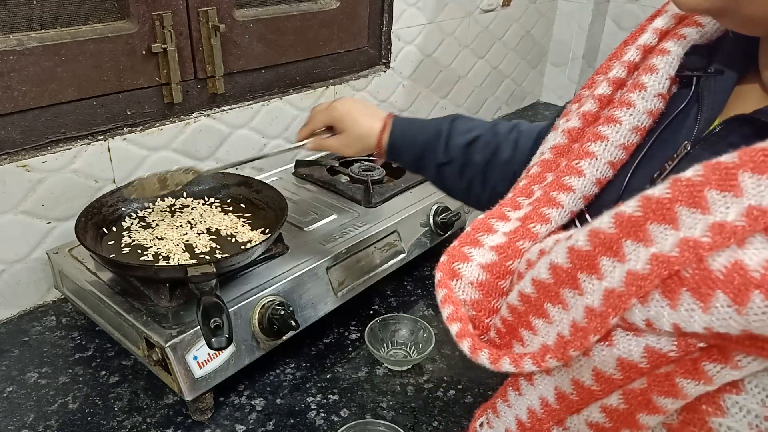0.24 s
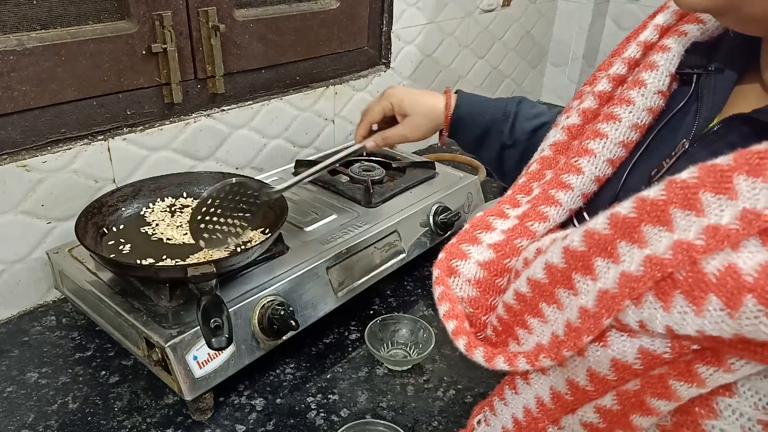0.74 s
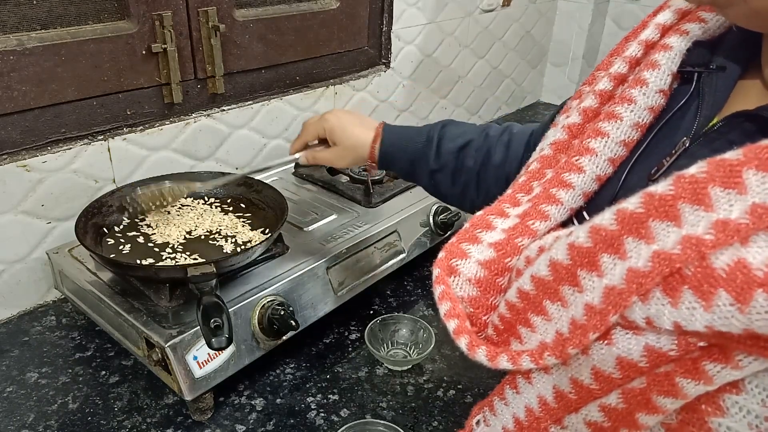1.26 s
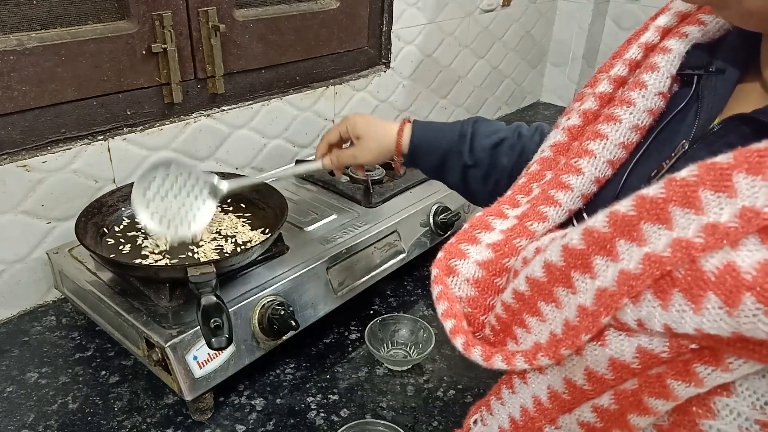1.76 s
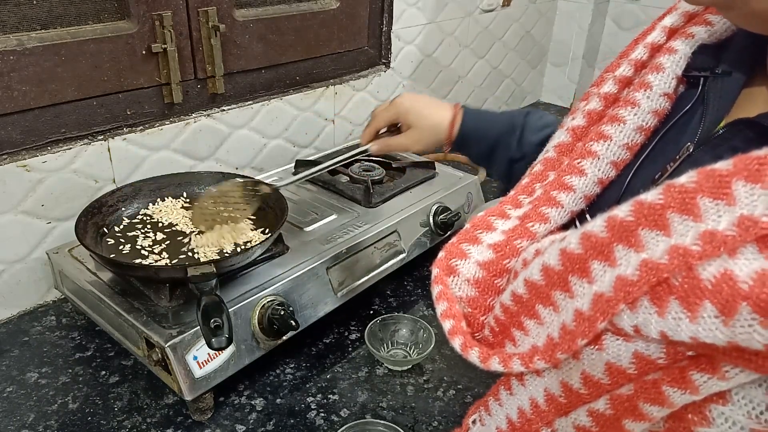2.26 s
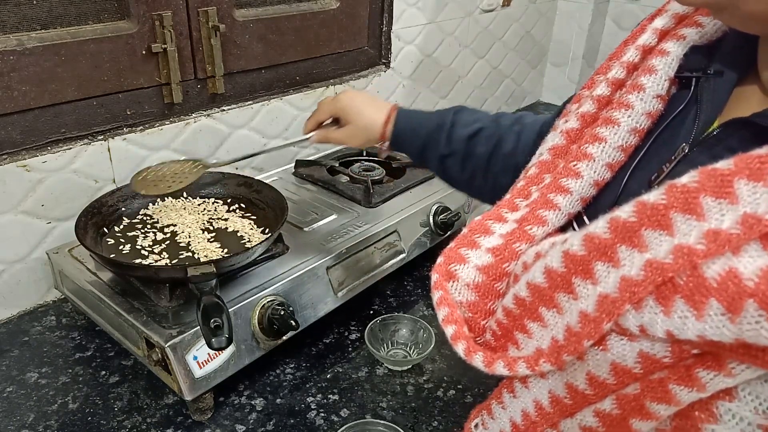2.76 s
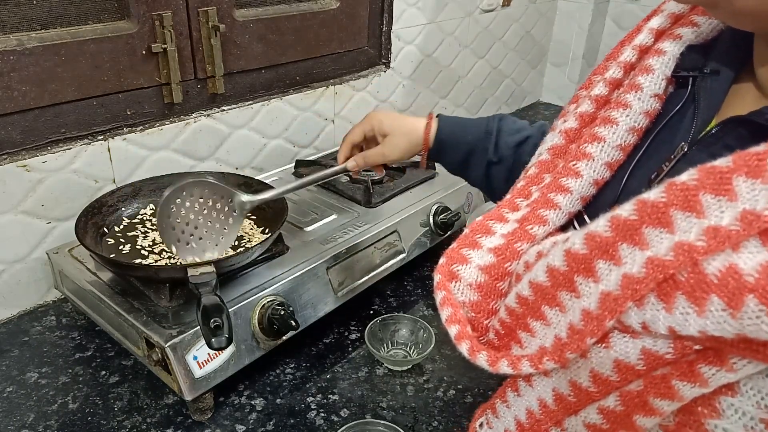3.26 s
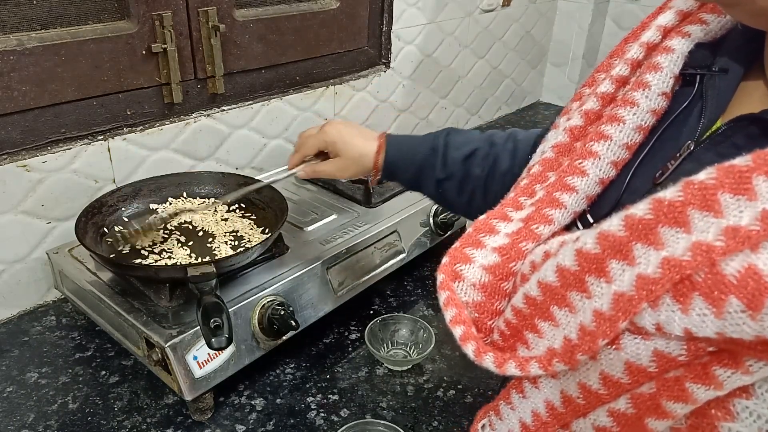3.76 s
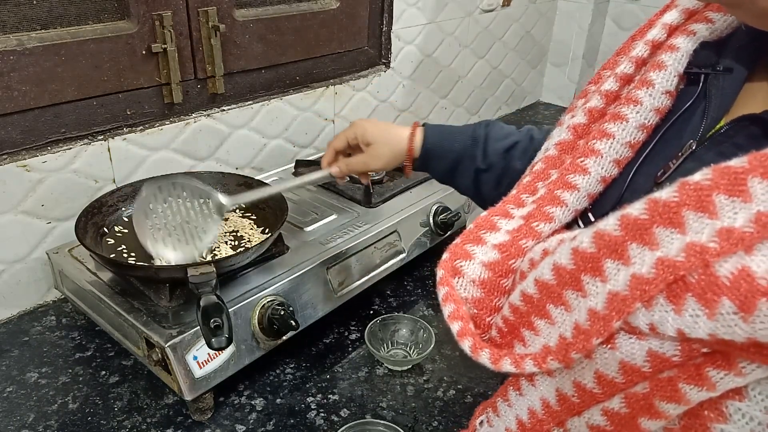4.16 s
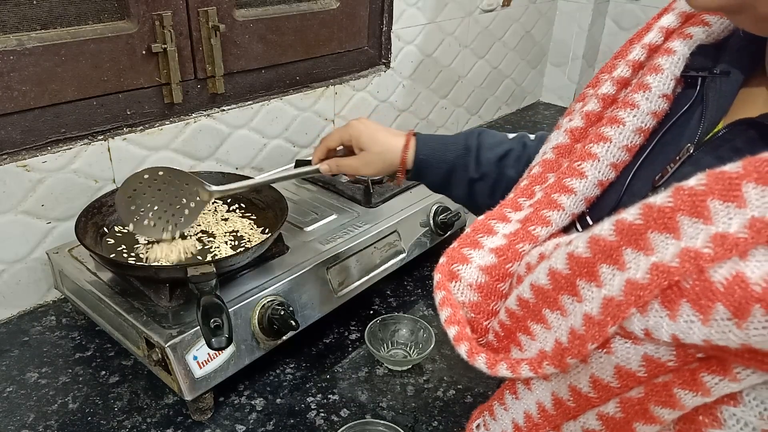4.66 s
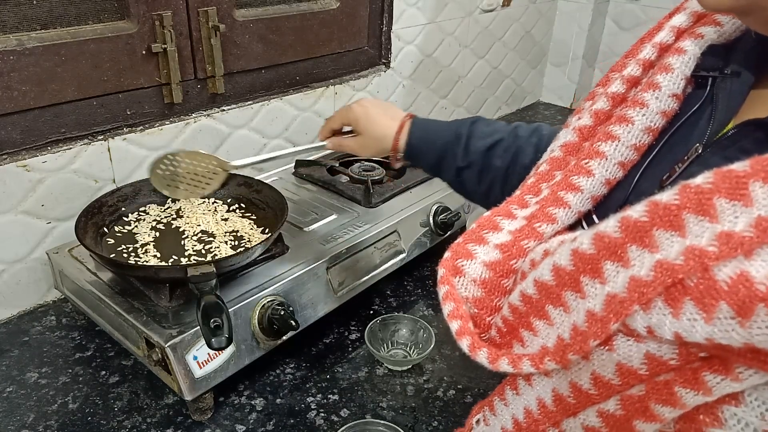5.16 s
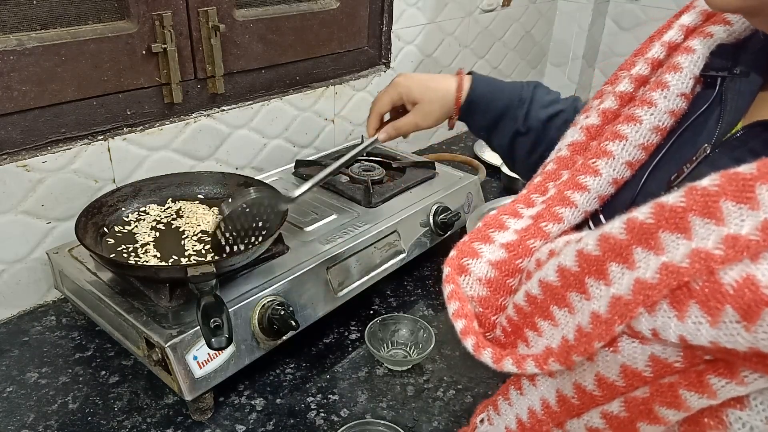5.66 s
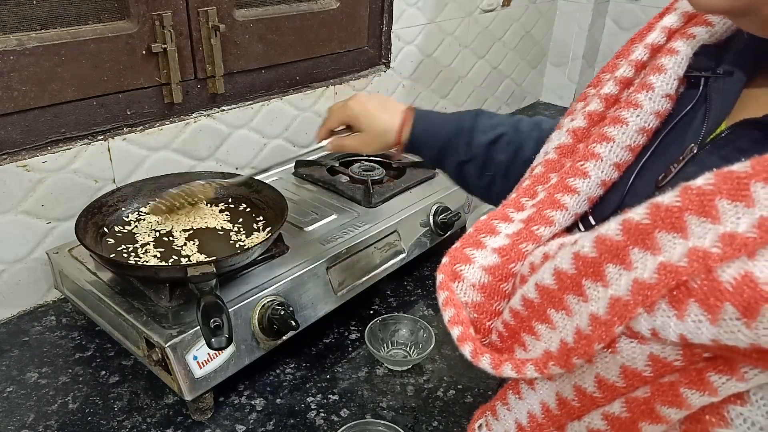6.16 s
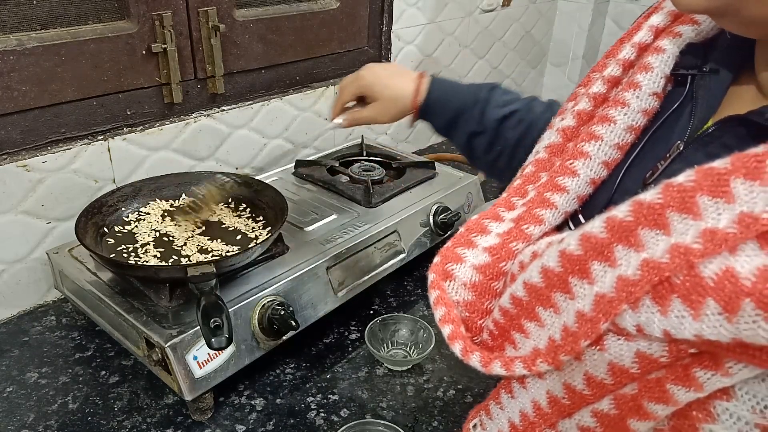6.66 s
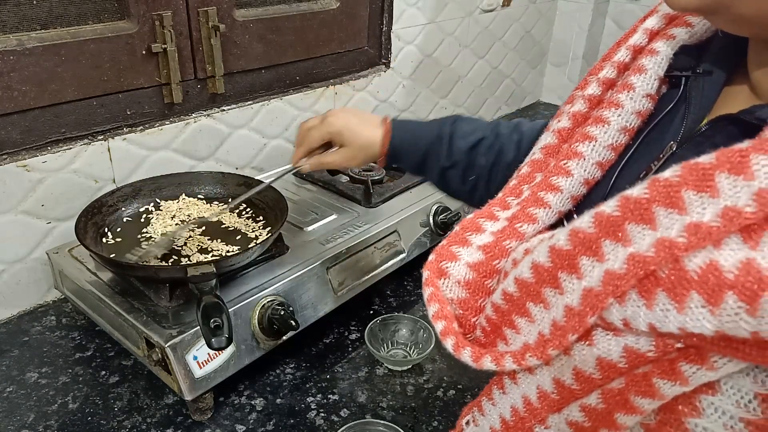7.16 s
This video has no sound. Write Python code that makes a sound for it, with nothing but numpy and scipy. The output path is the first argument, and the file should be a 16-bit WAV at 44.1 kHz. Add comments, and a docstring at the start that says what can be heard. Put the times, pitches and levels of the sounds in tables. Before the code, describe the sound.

A gas burner hushes very quietly throughout, in a bright tiled kitchen heard from fairly close. At 0.03 s a steel spoon hits the frying pan with a sharp ringing clank. Softer, seed-muffled knocks follow around 0.5, 1.0, 1.4 and 1.8 s, some with chattering contact, joined by low rumbling and dry rustling strokes. A bright clank comes at 2.5 s, then a heavy, booming one at 2.95 s. At 3.8 s the edge scrapes hard on metal with thin tinks; another clank rings at 4.2 s. Duller stirs lead to a strong chattering scrape at 5.4 s and a bright tink at 5.5 s. Paired clanks strike near 5.8 and 6.6 s, with gentle stirring between. A longer soft stroke starts at 7.05 s, with tiny seed ticks and a last knock at 7.3 s. Pan resonance and a faint low stove boom linger after sharp hits.

```python
"""A steel spoon stirs seeds in a frying pan: noise knocks and ringing modes make its thuds, clanks and
chatter. Each stroke is random tiny contacts: seeds rumble and rustle as they are shoved aside, then the
edge bites the metal and scrapes in stick-slip. Hot seeds tick now and then as short noise bursts, and
the spoon's rim sometimes tinks. Under it a gas burner hushes as coloured noise, the hollow stove booms
after sharp knocks, and the tiled kitchen adds reflections."""
import sys
import numpy as np
from scipy import signal
from scipy.fft import rfft, irfft
from scipy.io import wavfile
from scipy.ndimage import uniform_filter1d, map_coordinates

SR = 44100
rng = np.random.default_rng(int(sys.argv[2]) if len(sys.argv) > 2 else 0)


def store_pcm(level_fs):
    """Save levels as 16-bit WAV."""
    pcm = np.round(np.clip(level_fs, -1, 1) * 32767).astype(np.int16)
    wavfile.write(sys.argv[1], SR, np.atleast_2d(pcm).T)


N = 326781  # length in samples
RING = np.arange(SR) / SR  # one second of time, in seconds


def undb(db):
    """Turn decibels into a gain."""
    return 10 ** (np.asarray(db) / 20)


def unit(x):
    """Scale a sound to rms 1."""
    return x / np.sqrt(np.mean(x ** 2))


def unit_energy(x):
    """Scale a short sound or response to energy 1."""
    return x / np.linalg.norm(x)


def ramp(x):
    """Rise from 0 to 1 and stay there."""
    return np.clip(x, 0, 1)


def through(x, response):
    """Pass a sound through an impulse response."""
    return signal.fftconvolve(x, response)[:len(x)]


def colour(x, points, size=4096):
    """Filter a sound to the given (pitch_hz, level_db) outline, with no sound before its cause."""
    hz, db = np.transpose(points)
    grid = np.log(np.fft.rfftfreq(size, 1 / SR) + 1)
    log_gain = np.log(undb(np.interp(grid, np.log(hz), db)))
    # folding the cepstrum gives the minimum-phase response
    cepstrum = irfft(log_gain)[:size // 2]
    cepstrum[1:] *= 2
    response = irfft(np.exp(rfft(cepstrum, size)))[:size // 2]
    return through(x, response)


def fade(t60):
    """Die away over one second of time, falling 60 dB every t60 seconds."""
    return undb(-60 * RING / t60)


def walk(rate):
    """Wander slowly at random, with rms 1; rate is in new values per second."""
    k = int(SR / rate)
    steps = np.repeat(rng.standard_normal(N // k + 1), k)
    return unit(uniform_filter1d(steps, k)[:N])


def clicks(rate, spread_db, size):
    """Random tiny contacts of uneven strength, about rate per second, at rms 1."""
    sign = rng.choice([-1, 1], size)
    strength = sign * undb(spread_db * rng.uniform(-1, 1, size))
    return unit((rng.random(size) < rate / SR) * strength)


def modes(hz, db, t60, scatter_db, split, count=3):
    """Ringing metal: unevenness splits each mode into close partials that beat, wider in the treble."""
    hz, db, t60 = (np.repeat(v, count) for v in (hz, db, t60))
    sign = rng.choice([-1, 1], len(hz) // count).repeat(count)
    gain = undb(db + scatter_db * rng.standard_normal(len(hz))) * sign
    hz = hz * (1 + split * hz / 1000 * rng.uniform(-1.01, 1, len(hz)))
    phase = (2 * np.pi * hz[:, None] * RING).astype(np.float32)
    decay = np.exp((-np.log(1000) / t60[:, None] * RING).astype(np.float32))
    return unit_energy(gain @ (np.sin(phase) * decay))


def roll_off(hz, cut_hz, db_per_oct):
    """Gain of a contact: flat up to its cut-off, then falling."""
    return 1 / np.hypot(1, undb(db_per_oct * np.log2(hz / cut_hz)))


# how long the tiled room rings: pitch_hz, t60_s (time to fall 60 dB)
ROOM_DECAY = [(100, 0.36), (260, 0.86), (700, 0.65), (1840, 0.68), (4850, 0.67), (12800, 0.32)]


def kitchen(wet_db, build_s=0.0017):
    """Direct sound, then dense reflections from the tiles that build up and fade at each pitch's own pace."""
    hz, t60 = np.transpose(ROOM_DECAY)
    noise = rfft(rng.standard_normal(SR))
    log_hz = np.log(np.arange(len(noise)) + 1)
    tail = np.zeros(SR)
    for share, t in zip(np.eye(len(hz)), t60):
        # share picks out one overlapping band
        tail += irfft(noise * np.interp(log_hz, np.log(hz), share), SR) * fade(t)
    response = undb(wet_db) * unit_energy(tail * (1 - np.exp(-RING / build_s)))
    response[0] += 1
    return response


# tone of the gas flame: pitch_hz, level_db (relative)
FLAME_TONE = [(24, -25), (40, 8.5), (91, 22.5), (570, -3), (790, 8), (1210, -6.5), (1370, 0.5),
              (1760, -10.5), (5440, -8), (16000, -15.5)]


def burner(level_db=-52.5, flutter_db=0.53):
    """The gas flame: noise coloured to a soft, slightly fluttering hush."""
    hush = unit(colour(rng.standard_normal(N), FLAME_TONE))
    return undb(level_db + flutter_db * walk(15)) * hush


# bright resonances of the spoon's bowl: pitch_hz, width_hz, level_db (relative)
BOWL_MODES = [(7220, 60, -0.5), (6870, 23, -3), (6540, 16, -5), (8230, 9.1, -10), (9830, 42, 1),
              (10350, 77, -15), (10640, 48, 1.5), (13200, 29, -9), (13700, 31, -2), (14500, 30, -19),
              (15000, 80, 0)]


def spoon_bowl(scatter_db):
    """The spoon's bowl rings at its own pitches; a narrower resonance rings longer."""
    hz, width_hz, level_db = np.transpose(BOWL_MODES)
    return modes(hz, level_db, np.log(1000) / (np.pi * width_hz), scatter_db, split=0.0015)


# ringing of the pan: pitch_hz, t60_s (left to ring freely), wall_db, floor_db, scraped_db
# (relative levels when struck on the wall, struck on the floor, or scraped)
PAN_MODES = [(203, 3.24, -28, -28, -49), (229.3, 2.04, -26, -19.5, -44), (355.4, 1.1, -15, -12, -8),
             (438, 0.42, -11, -19, -23), (473.3, 0.26, -8.5, 15.5, -10), (660, 1.1, 1, 2, -4),
             (710, 0.74, -4.5, 8.5, -12), (755, 0.53, 8.5, 4.5, -33), (812.8, 0.77, -12, -1.5, 4),
             (793, 1.7, 1, -37, -42), (851, 1, -5, -15, -27), (962, 0.64, 3.5, -5, -10),
             (960, 0.82, 7, -11, -29), (1148, 0.48, -12, 7, -4), (1141, 0.58, -13, 10, -40),
             (1341, 0.64, -6, 9.5, -10), (1381, 0.29, -10, 15.5, 6.5), (1417, 0.66, 5, -28, 6.5),
             (1678, 0.23, 4, -12, -13.5), (1780, 0.38, 5, -17, -17), (2047, 0.59, -9, -6, 0.5),
             (2079, 0.77, -25.5, 5.5, 4), (2134, 0.92, -38, -26, 0.5), (2740, 0.92, -27, -17, -13),
             (3183, 0.7, -18, -20, -2), (3600, 0.45, -17, -14, -14), (4260, 0.45, -42, -34, -7.5),
             (5040, 0.23, -12, -16, -24), (5440, 0.35, -2, -27, -7), (6400, 0.24, -34, -29, -40)]
# tone of the short clank: pitch_hz, level_db (relative)
CLANK_TONE = [(71, -65), (120, -48.5), (231, -21.5), (418, -16), (473, -9), (580, -10), (773, 12),
              (856, -8.5), (930, -3.5), (1070, -4), (1340, -8), (2930, -28), (3170, -23), (6240, -30),
              (16000, -52)]


def blow(room, steel_db, place, chatter_db, chatter_s, ring_db=-1.5, ring_growth=0.13,
         bowl_db=-29, bowl_choke=0.26, clank_t60=0.049, crack_db=-8, crack_t60=0.062):
    """One knock: a crack, a dense clank and the ring of pan and spoon; then the spoon buzzes on the metal."""
    pan_hz, pan_t60, wall_db, floor_db, _ = np.transpose(PAN_MODES)
    clank, crack = (unit_energy(rng.standard_normal(SR) * fade(t)) for t in (clank_t60, crack_t60))
    buzz = clicks(rate=810, spread_db=4, size=SR) * np.exp(-(RING / chatter_s) ** 4)
    contacts = undb(chatter_db) * unit_energy(buzz)
    contacts[0] += 1  # the first hit
    # a harder knock rings the pan more and chokes the spoon's bowl
    struck_db = wall_db + place * (floor_db - wall_db)
    ring = modes(pan_hz, struck_db, pan_t60, scatter_db=1.5, split=0.00504)
    ring *= undb(ring_db + ring_growth * steel_db)
    bowl = spoon_bowl(scatter_db=3) * undb(bowl_db - bowl_choke * steel_db)
    body = unit_energy(through(unit_energy(colour(clank, CLANK_TONE)) + bowl, room))
    edge = unit_energy(colour(crack, [(200, -31), (800, 7), (1250, -5.0), (1700, -4.5), (2500, -17),
                                      (7000, -18.0), (16000, -42)]))
    return through(body + ring, contacts) + undb(crack_db) * edge


# edges of the bands that set a knock's balance: pitch_hz
BAND_EDGES = [150, 550, 1000, 2400, 8000, 16000]


def band_levels(x, weigh_s=0.22):
    """Level of a knock's first moments in each band, in dB."""
    size = int(weigh_s * SR)
    power = 2 * abs(rfft(x[:size], SR)) ** 2 / (SR * size)
    return 10 * np.log10([power[lo:hi].sum() for lo, hi in zip(BAND_EDGES, BAND_EDGES[1:])])


# spoon blows: start_s, thud_db, thud_cutoff_hz, steel_db (bare metal contact), steel_cutoff_hz,
# place (0 wall to 1 floor), chatter_db; all levels are relative
SPOON_BLOWS = [(0.03, -7.5, 328, 0.5, 15000, 0.34, -7), (0.476, -15.5, 524, -26.5, 900, 0.79, 4),
               (0.987, -14.5, 390, -31.5, 6040, 0.35, 8), (1.413, -10.5, 473, -39, 6000, 0.34, 16),
               (1.802, -10, 272, -33, 9000, 0.31, -2), (1.828, -20, 380, -20.5, 6650, 1, -30),
               (2.154, -9, 553, -13, 1080, 0.69, -12), (2.541, -12, 314, -0.5, 10700, 0.26, -5),
               (2.947, 2, 573, 3.5, 1620, 0.32, 0), (3.414, -6.5, 487, -19.5, 1580, 0.57, -8),
               (3.761, -15, 542, -30.5, 1200, 0.4, -19), (3.786, -6, 636, -7, 1100, 0.51, 7.5),
               (4.23, -8, 450, 0.5, 2360, 0.55, -3), (4.321, -19, 450, -12.5, 5200, 0.67, -27),
               (4.571, -10, 485, -24, 1000, 0.27, -10), (4.97, -11, 480, -21.5, 7450, 0.73, -28),
               (4.998, -13, 456, -19, 2670, 1, -21), (5.265, -8.5, 600, -25.5, 9000, 0.36, -1),
               (5.424, -6.5, 600, -15.5, 1000, 0.63, 18), (5.781, -9, 357, -2, 9400, 0.38, -4.5),
               (5.841, -1, 440, 0.5, 4600, 0.59, -21), (6.225, -15.5, 537, -23.5, 1200, 0.75, -2),
               (6.593, -7, 378, -0.5, 13500, 0.41, 3), (6.683, -2.5, 550, 1, 2700, 0.76, -39),
               (7.171, -17.5, 453, -21.5, 6000, 1, -31), (7.318, -7, 710, -10.5, 1760, 0.37, -15)]
# reference knock in each band, before contact strength and cut-off: level_db on the wall, on the floor
WALL_BALANCE = [-34, -19.5, -34, -35.5, -36.5]
FLOOR_BALANCE = [-30, -34, -24.5, -30.5, -36]
STEEL_DB_PER_OCT = 10  # how steeply a longer contact loses its treble
# the buzz lasts this long, or this share of the time to the next blow if that is shorter
CHATTER_S, CHATTER_SHARE = 0.11, 0.47


def blows(bass_db=-5):
    """Steel on steel: the sharper the contact, the brighter the knock."""
    out, room = np.zeros(N + SR), kitchen(wet_db=5.5)
    centres = np.sqrt(np.multiply(BAND_EDGES[:-1], BAND_EDGES[1:]))
    hz = np.geomspace(BAND_EDGES[0], BAND_EDGES[-1], 28)
    gaps = np.diff([row[0] for row in SPOON_BLOWS], append=np.inf)
    for (s, _, _, steel_db, cut_hz, place, chatter_db), gap_s in zip(SPOON_BLOWS, gaps):
        chatter_s = min(CHATTER_S, CHATTER_SHARE * gap_s)
        knock = blow(room, steel_db, place, chatter_db, chatter_s)
        # bring every band to its level for this place on the pan
        target_db = WALL_BALANCE + place * np.subtract(FLOOR_BALANCE, WALL_BALANCE)
        balance = target_db - band_levels(knock)
        body_db = np.interp(np.log(hz), np.log([hz[0], *centres]), [balance[0] + bass_db, *balance])
        contact_db = steel_db + 20 * np.log10(roll_off(hz, cut_hz, STEEL_DB_PER_OCT))
        start = int(s * SR)
        out[start:start + SR] += colour(knock, list(zip(hz, body_db + contact_db)))
    return out[:N]


# tone of pan and stove thudding together: pitch_hz, level_db (relative)
THUD_TONE = [(70, -15.5), (130, -17), (175, -6), (245, 1.5), (300, -0.5), (355, 5), (410, -5.5),
             (470, 11.5), (560, -2), (700, 12), (1200, -12.5)]
THUD_DB_PER_OCT = 25  # fall above each thud's cut-off
# at this steel level a thud swells over this time; less steel makes it slower
CUSHION_S, CUSHION_DB = 0.0068, -30.5


def thuds(db=8, t60=0.15, tail_db=-12, tail_t60=1.0):
    """Each blow, cushioned by seeds, jolts pan and stove: a dull noise thud that hangs briefly in the room."""
    out = np.zeros(N + SR)
    hz = np.geomspace(50, 5000, 40)
    decay = fade(t60) + undb(tail_db) * fade(tail_t60)
    for s, thud_db, cut_hz, steel_db, *_ in SPOON_BLOWS:
        swell = 1 - np.exp(-RING * undb(steel_db - CUSHION_DB) / CUSHION_S)
        jolt = colour(rng.standard_normal(SR) * swell * decay, THUD_TONE)
        soft_db = 20 * np.log10(roll_off(hz, cut_hz, THUD_DB_PER_OCT))
        cushioned = colour(jolt, list(zip(hz, soft_db)))
        start = int(s * SR)
        out[start:start + SR] += undb(db + thud_db) * unit_energy(cushioned)
    return out[:N]


def stove_boom(hz=72, t60=1.65, swell_s=0.027, db=-35, floor_db=-14, sharp_hz=3500):
    """Sharp steel knocks, most of all on the pan's wall, shake the hollow stove, which swells into a low boom."""
    force = np.zeros(N)
    for s, _, _, steel_db, cut_hz, place, _ in SPOON_BLOWS:
        sharpness = roll_off(sharp_hz, cut_hz, STEEL_DB_PER_OCT)
        force[int(s * SR)] = undb(db + steel_db + floor_db * place) * sharpness
    boom = np.sin(2 * np.pi * hz * RING) * fade(t60) * (1 - np.exp(-RING / swell_s))
    return through(force, boom)


def seed_jumps(db=-44.5, growth=0.55, t60=0.29):
    """Loudness of the patter of seeds thrown up by the blows: a heavier thud throws up more."""
    kicks = np.zeros(N)
    for s, thud_db, *_ in SPOON_BLOWS:
        kicks[int(s * SR)] = undb(db + growth * thud_db)
    return through(kicks, fade(t60))


# strokes through the seeds: start_s, length_s, bite_s (time until the edge bites the metal),
# drag_db, scrape_db, rustle_db (levels before the mix gains in stirring)
SPOON_STROKES = [(0.496, 0.31, 0.12, -44, -51, -52), (0.979, 0.28, 0.08, -50, -52.5, -51),
                 (1.367, 0.31, 0.084, -44.5, -53, -54.5), (1.823, 0.14, 0.04, -39.5, -46.5, -52.5),
                 (2.138, 0.37, 0.17, -47, -56.5, -54), (3.177, 0.099, 0.04, -60, -51, -60),
                 (3.39, 0.22, 0.036, -49, -52, -56), (3.774, 0.19, 0.12, -34, -22.5, -51),
                 (4.584, 0.28, 0.13, -43, -51.5, -52), (4.956, 0.14, 0.013, -42.5, -47, -70),
                 (5.382, 0.14, 0.13, -26.5, -25.5, -50), (6.21, 0.29, 0.13, -45.5, -52, -56),
                 (7.043, 0.53, 0.13, -41.5, -55, -48.5)]
LAND_S, LIFT_S = 0.028, 0.041  # the spoon settles into the seeds, and leaves the pan
DRAG_FALL_DB_PER_S, SEEDS_FALL_DB_PER_S = 40.5, 23  # the heap ahead of the spoon thins out
TUMBLE_S = 0.039  # the seeds take this long to get moving
BITE_DB, EASE_DB_PER_S = 32, 13  # the scrape swells as the edge reaches metal, then the hand eases off
GRIT_LEAD = 0.61  # grit has swelled fully after this share of the bite time
GRIT_GROWTH, GRIT_PIVOT_DB = 0.73, -58  # pressing harder adds less grit than ring; equal at the pivot


def stir_gains():
    """Gains of drag, ring, grit and rustle: each stroke shoves seeds aside, bites the metal and lifts."""
    gains = np.zeros((4, N))
    for s, length_s, bite_s, drag_db, scrape_db, seeds_db in SPOON_STROKES:
        first = int(s * SR)
        age = RING[:N - first]
        contact = ramp(age / LAND_S) * ramp(1 - (age - length_s) / LIFT_S)
        ease_db = EASE_DB_PER_S * np.maximum(age - bite_s, 0)
        grit_db = GRIT_PIVOT_DB + GRIT_GROWTH * (scrape_db - GRIT_PIVOT_DB)
        drag = undb(drag_db - DRAG_FALL_DB_PER_S * age)
        ring = undb(scrape_db - BITE_DB * ramp(1 - age / bite_s) - ease_db)
        grit = undb(grit_db - BITE_DB * ramp(1 - age / (GRIT_LEAD * bite_s)) - ease_db)
        seeds = undb(seeds_db - SEEDS_FALL_DB_PER_S * age) * ramp(age / TUMBLE_S)
        gains[:, first:first + len(age)] += contact * np.array([drag, ring, grit, seeds])
    return gains


# tones of the gritty edge, the rumbling drag and the rustling seeds: pitch_hz, level_db (relative)
GRIT_TONE = [(1410, -30), (2400, -7), (3960, -2.5), (4420, -1), (5140, -10.5), (5570, 3), (8750, -19),
             (9480, -10), (16000, -39)]
DRAG_TONE = [(88, -33), (150, -33), (408, 2), (465, -0.5), (534, -3.5), (647, -5), (818, -6.5),
             (877, -11.5), (1200, -7.5), (1560, -18), (2640, -120)]
SEED_TONE = [(1470, -44), (2500, -47), (2970, -90), (3180, -24), (5030, 9.5), (7470, 15.5), (8800, 8),
             (12500, 11), (16000, 1.5)]
SPOON_DAMPING = 3.2  # the pressing spoon makes the pan's ring this many times shorter
WAVER, WAVER_PER_S = 0.01, 18  # typical pitch bend as a share of pitch, and new bends per second


def stirring(drag_db=-3, ring_db=-1, grit_db=-4, seeds_db=-3, rasp_db=-12):
    """The spoon rumbles over seeds, its edge sticks and slips on the metal, and seeds tumble."""
    drag, ring, grit, seeds = stir_gains()
    seeds = np.hypot(seeds, seed_jumps())
    hz, t60, _, _, scraped_db = np.transpose(PAN_MODES)
    # the edge catches and lets go in short bursts
    bursts = undb(3 * walk(50).clip(-2, 1.3))
    slips = unit(clicks(rate=1000, spread_db=7, size=N) * bursts)
    pan = modes(hz, scraped_db, t60 / SPOON_DAMPING, scatter_db=0.5, split=0.00615)
    singing = through(ring * slips, pan)
    # changing pressure bends the pitch: read the sound slightly early or late
    drift = np.cumsum(WAVER * walk(WAVER_PER_S))
    drift = drift - uniform_filter1d(drift, size=8000)
    singing = map_coordinates(singing, [np.arange(N) + drift], mode="nearest")
    rasp = unit(colour(slips, [(500, -8), (900, 1.5), (1420, -17), (1750, -15.5), (2100, 7), (2700, -40)]))
    edge = unit(colour(through(slips, rng.standard_normal(SR) * fade(0.0037)), GRIT_TONE))
    rumble = unit(colour(clicks(rate=700, spread_db=9, size=N), DRAG_TONE))
    tumbling = clicks(rate=600, spread_db=10, size=N) * undb(2 * walk(35).clip(-2, 1.5))
    rustle = unit(colour(tumbling, SEED_TONE))
    dry = undb(drag_db) * drag * rumble + undb(grit_db) * grit * edge
    dry += undb(seeds_db) * seeds * rustle + undb(rasp_db) * ring * rasp
    noises = through(dry, unit_energy(kitchen(wet_db=-2)))
    return noises + undb(ring_db) * through(singing, unit_energy(kitchen(wet_db=-4.5)))


# seeds ticking in the heat: start_s, peak_db (before the shared gain and the room)
SEED_POPS = [(0.824, -46), (1.4441, -24.5), (1.5584, -45), (4.7426, -27), (5.3428, -23.5), (6.0994, -34.5),
             (6.1624, -48), (7.1157, -30), (7.1387, -23), (7.2524, -20.5)]


def pops(db=-2):
    """A hot seed splits with one tiny bright tick: a very short burst of noise."""
    out = np.zeros(N + SR)
    for s, peak_db in SEED_POPS:
        burst = rng.standard_normal(SR) * fade(0.0027)
        tick = colour(burst, [(1000, -24), (4000, -9.0), (10000, 8.5), (16000, -1.5)])
        start = int(s * SR)
        out[start:start + SR] += undb(peak_db + db) * tick / abs(tick).max()
    return through(out[:N], kitchen(wet_db=-4))


# taps of the spoon's rim: start_s, level_db (before the shared gain and the room)
RIM_TAPS = [(3.821, -9), (3.854, -16), (4.317, -11), (4.345, -14), (5.265, -9.5), (5.489, -4)]


def tinks(db=-7, tick_db=-2, tick_t60=0.036):
    """The rim grazes the pan: a thin noise tick, and the spoon's bowl rings freely."""
    out = np.zeros(N + SR)
    for s, tap_db in RIM_TAPS:
        bowl = spoon_bowl(scatter_db=2)
        burst = rng.standard_normal(SR) * fade(tick_t60)
        tick = unit_energy(colour(burst, [(1500, -12), (5000, -7.5), (10000, 11), (16000, -5)]))
        start = int(s * SR)
        out[start:start + SR] += undb(db + tap_db) * (bowl + undb(tick_db) * tick)
    return through(out[:N], kitchen(wet_db=-3))


def scene():
    """Flame, spoon, pan, stove and seeds together."""
    mix = burner() + blows() + thuds() + stove_boom() + stirring() + pops() + tinks()
    return mix[None]


def record(dry):
    """Round the loudest peaks, thin the deep bass and cut the top."""
    rounded = np.tanh(1.137 * dry) / 1.265
    thin = signal.sosfilt(signal.butter(3, 58, "highpass", fs=SR, output="sos"), rounded)
    return signal.sosfilt(signal.ellip(10, 0.2, 80, 16000, fs=SR, output="sos"), thin)


dry = scene()
out = record(dry)
store_pcm(out)
```